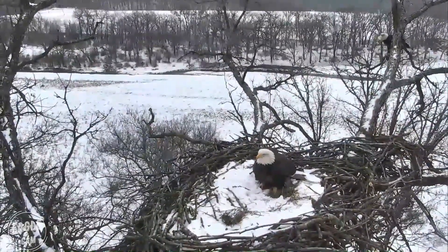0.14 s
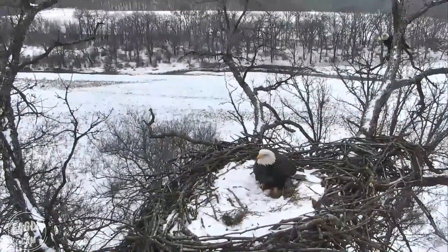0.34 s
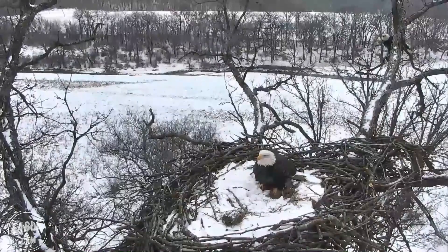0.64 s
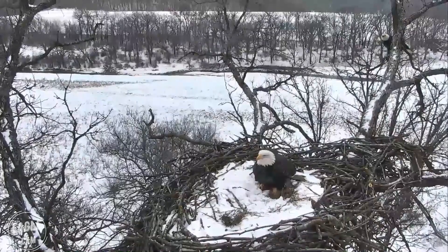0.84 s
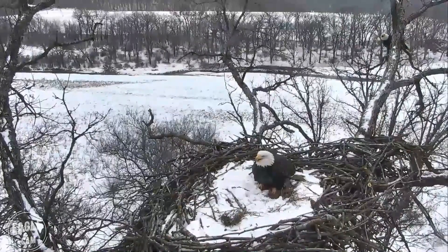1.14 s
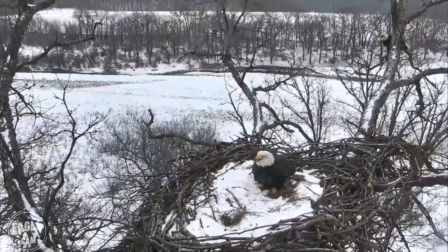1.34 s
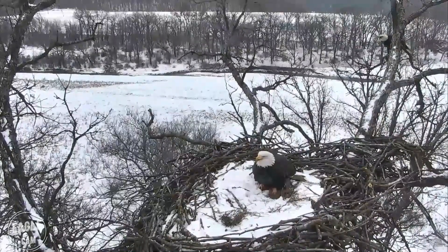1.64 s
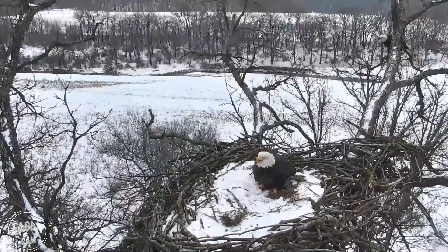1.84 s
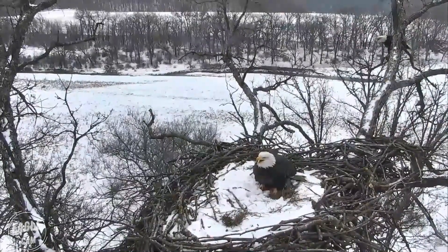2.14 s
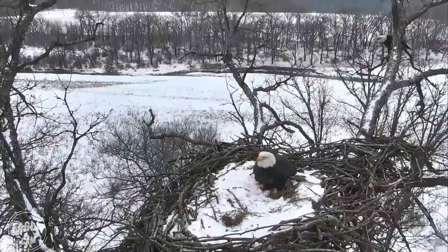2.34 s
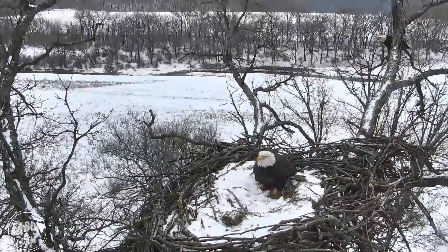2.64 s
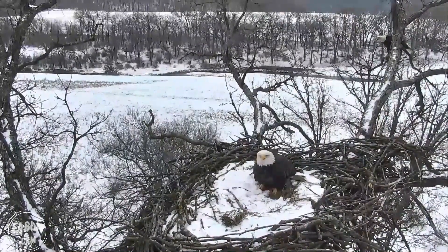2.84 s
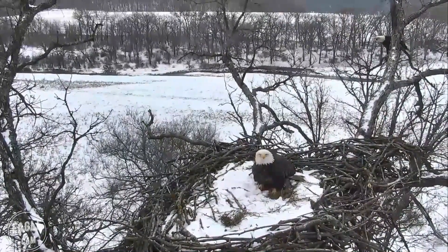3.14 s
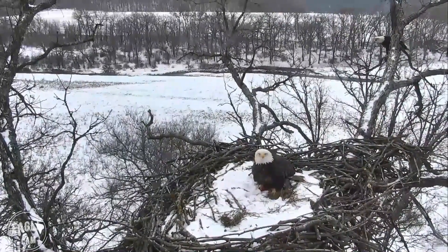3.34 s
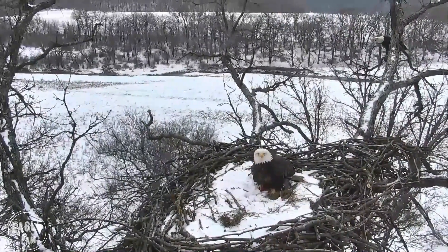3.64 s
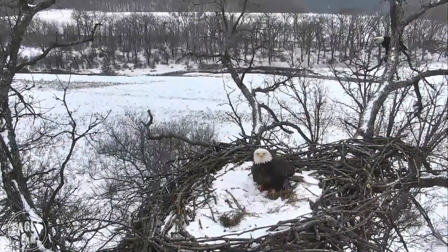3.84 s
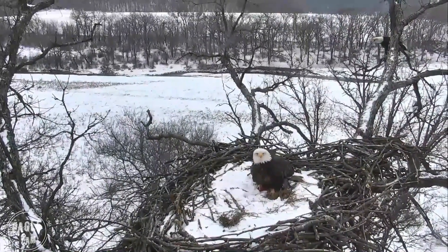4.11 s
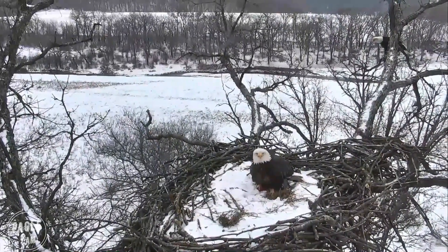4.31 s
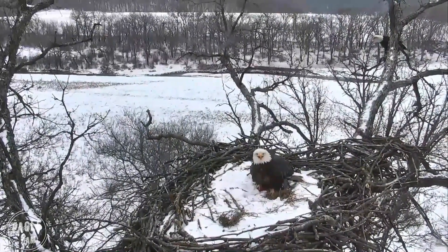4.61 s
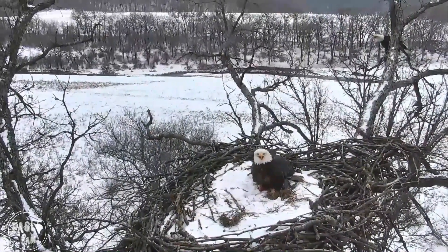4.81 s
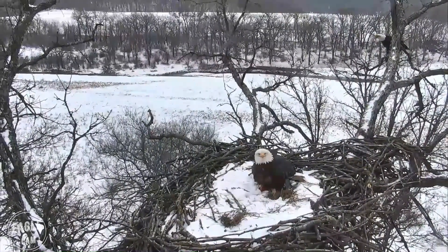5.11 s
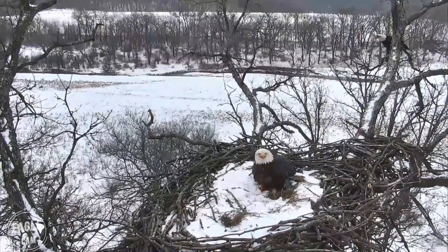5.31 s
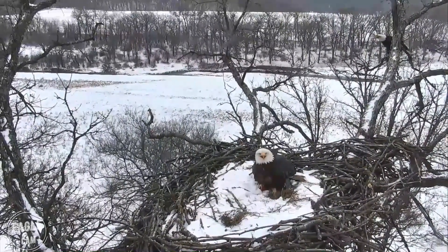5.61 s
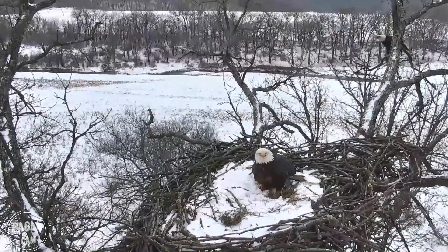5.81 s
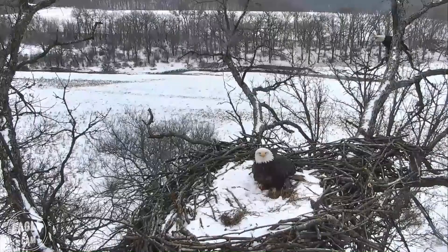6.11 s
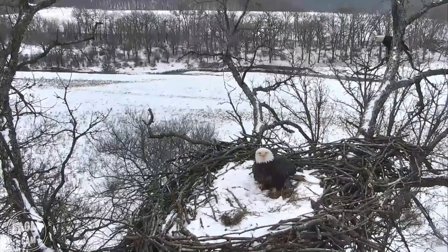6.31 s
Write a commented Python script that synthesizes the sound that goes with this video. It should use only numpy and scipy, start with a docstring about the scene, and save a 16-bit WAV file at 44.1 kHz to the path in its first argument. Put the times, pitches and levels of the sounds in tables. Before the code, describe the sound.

Two eagles call over a snowy open field. One pipes three runs of very short, near-pure whistles, each starting high and mostly falling, with little squeaks and cracks. The other gives four steady, nasal, raspy screams, lower and longer, dropping at the end. Close nest echoes and a faint scatter from trees surround them. Uneven low wind thumps on the microphone, with a soft airy rush and faint hiss behind.

```python
"""A treetop nest above a snowy field, where two bald eagles call in the wind.
One gives four long, hoarse screams: partials of a gliding pitch, roughened by a second vibration.
The other answers with three runs of piping chirps, near-pure whistles that mostly step down in pitch.
Nest and branches throw the calls back as filtered echoes and a thin scatter.
Wind, made of shaped noise, rumbles on the microphone and rushes through the trees."""
import sys
import numpy as np
from scipy import signal
from scipy.fft import rfft, irfft
from scipy.io import wavfile

SR = 44100
rng = np.random.default_rng(int(sys.argv[2]) if len(sys.argv) > 2 else 0)


def to_wav(sig):
    """Store sig (one row per channel, or 1-D mono) as 16-bit WAV at the path in sys.argv[1].

    Samples outside -1..1 are clipped; the rate is SR.
    """
    pcm = np.clip(np.atleast_2d(sig), -1, 1) * 32767
    pcm = np.round(pcm).astype(np.int16)
    wavfile.write(sys.argv[1], SR, pcm.T)  # frames by channels


N = 284886


def from_db(db):
    """Decibels to amplitude gain."""
    return 10 ** (np.asarray(db) / 20)


def rms_one(x):
    """Scale to unit power."""
    return x / np.sqrt(np.mean(x ** 2) + 1e-20)


def at_hz(points, hz):
    """Read a spectrum in dB on a log-frequency axis."""
    points = np.array(points)
    return np.interp(np.log(hz), np.log(points[:, 0]), points[:, 1])


def at_times(points, t):
    """Read a level curve at times t."""
    times, levels = np.transpose(points)
    return np.interp(t, times, levels)


def butter(x, hz, kind, order=2):
    """Causal Butterworth filter."""
    hz = np.clip(hz, 10, .45 * SR)
    return signal.sosfilt(signal.butter(order, hz, kind, fs=SR, output="sos"), x + 1e-18)


def wander(rate_hz, size):
    """Smooth random drift of about unit spread: noise low-passed at rate_hz, past the filter's start-up."""
    noise = rng.standard_normal(N // 4 + size)
    return rms_one(butter(noise, rate_hz, "low"))[-size:]


def gate(t, start, end, rise, fall):
    """Smooth fades centred on start and end."""
    opening = np.clip((t - start) / rise + .5, 0, 1)
    closing = np.clip((end - t) / fall + .5, 0, 1)
    return np.sin(np.pi / 2 * opening * closing) ** 2


def span(first_s, last_s):
    """Sample times of one call."""
    return np.arange(round(first_s * SR), round(last_s * SR)) / SR


def add(out, t, sound):
    """Mix a sound in at its times."""
    first = round(t[0] * SR)
    out[first:first + len(t)] += sound[:N - first]


def wind(rumble_db=0.0, buffet_db=0.72, rush_db=4.0, hiss_db=-60.5, lumps_db=0.7):
    """Low-band noise rumbles and buffets at the microphone; air rushes through bare trees over a hiss."""
    # relative spectrum of wind and hiss: f/Hz, density/dB per Hz
    air_spectrum = [(11, -23), (18, -9.5), (42, 0.5), (70, -4), (98, -3.5), (154, -16), (243, -22.5),
                    (452, -30), (691, -34), (998, -40.5), (1530, -46), (2330, -53.5), (3990, -60),
                    (5150, -65), (15500, -76.5)]
    # slow rumble at the microphone, before its trim: t/s, level/dB
    rumble_curve = [(0.0, -25), (0.03, -37), (0.07, -29), (0.74, -42), (1.17, -25.5), (1.29, -31.5),
                    (1.87, -34.5), (1.91, -24), (1.96, -36), (3.17, -46.5), (4.06, -41), (4.17, -29.5),
                    (4.25, -41), (5.13, -42.5), (6.03, -40.5), (6.12, -52), (6.41, -46), (6.46, -57)]
    # smaller eddies buffeting it, before their trim: t/s, level/dB
    buffet_curve = [(0.0, -38), (0.83, -42), (1.02, -34), (2.73, -45), (2.95, -40), (3.33, -42),
                    (3.38, -35.5), (3.44, -44.5), (3.63, -36.5), (3.69, -45.5), (4.19, -38.5), (4.3, -44),
                    (6.01, -44.5), (6.04, -38), (6.08, -51), (6.46, -48)]
    # wind in the trees, before its trim: t/s, level/dB
    rush_curve = [(0.0, -50), (0.25, -52.5), (0.9, -52), (1.01, -50), (3.17, -54.5), (4.08, -53.5),
                  (6.46, -56)]
    t = np.arange(N) / SR
    low_db, mid_db, high_db = at_times(rumble_curve, t), at_times(buffet_curve, t), at_times(rush_curve, t)
    hz = np.maximum(np.arange(N // 2 + 1) * SR / N, 1)
    air = irfft(rfft(rng.standard_normal(N)) * from_db(at_hz(air_spectrum, hz)), N)
    # reversing or rotating the same air keeps the bands from moving together
    low = rms_one(butter(air, 62.4, "low", order=4))
    mid = rms_one(butter(air[::-1], [70, 210], "band", order=3))
    high = rms_one(butter(np.roll(air, N // 3), [220, 1500], "band"))
    top = rms_one(butter(np.roll(air, N // 2), 1256, "high"))
    rumble = from_db(low_db + rumble_db) * low
    buffet = from_db(mid_db + buffet_db) * mid
    rush = from_db(high_db + rush_db) * high
    # the hiss follows the rush at half its swing in dB
    hiss = from_db(hiss_db + .5 * (high_db - np.mean(high_db))) * top
    return (rumble + buffet) * from_db(lumps_db * wander(29, N)) + rush + hiss


def scream(start, end, note_hz, climb_hz, scoop_hz, catch_hz, drop_hz, loud_db, swell_db, fundamental_db,
           rasp_delay, rasp_db, growth_db, ratio, unsteady, upper_db, first_tilt_db, last_tilt_db,
           beat_depth=0.12, roughness=0.011, jitter=.0012, waver_hz=4, shimmer_db=.5,
           mirror_db=-4, hoarse_db=-17, count=10):
    """A reedy tone catches, climbs and drops; a second vibration just under half its pitch makes it rasp."""
    # upper partials before tilt: f/Hz, level/dB against the second partial
    throat = [(2400, 1), (3650, -9.5), (4900, -17.5), (6100, -23.5), (7300, -38.5), (8600, -53),
              (9900, -50.5), (12000, -62.5), (14500, -76)]
    # side tones of the second vibration between the partials, before tilt: f/Hz, level/dB
    side_spectrum = [(600, -18.5), (1800, -2), (3050, -6.5), (4300, -14), (5500, -9.5), (6800, -20),
                     (8000, -34.5), (10000, -40), (14000, -54.5)]
    scoop_s, drop_s = .016, .042          # slide up onto the note; fall as the air runs out
    catch_at_s, catch_hz_per_s = .055, 1800   # deeper catches take longer
    climb_share = .85                     # share of the scream over which the pitch climbs
    push_db, push_s = .5, .04             # the first push of air is the strongest
    slack_db_per_hz, fundamental_db_per_hz = .1435, .06   # level lost as pitch sags
    rasp_rise_s, rasp_at_drop_db = .026, 9.5   # quick onset, flare at the end

    t = span(start - .02, end + .02)
    size = len(t)
    age = np.maximum(t - start, 0)
    progress = np.minimum(age / (end - start), 1)

    drop = np.clip(1 - (end - t) / drop_s, 0, 1.2) ** 2
    catch = np.exp(-((age - catch_at_s) * catch_hz_per_s / catch_hz) ** 2)
    slack_hz = scoop_hz * np.exp(-age / scoop_s) + catch_hz * catch + drop_hz * drop
    climb = climb_hz * np.sin(np.pi / 2 * np.minimum(progress / climb_share, 1))
    pitch = note_hz + climb - slack_hz + waver_hz * wander(15.6, size)

    effort_db = loud_db + swell_db * (progress - .5)
    level_db = effort_db + push_db * np.exp(-age / push_s) - slack_db_per_hz * slack_hz
    base_db = effort_db + fundamental_db - fundamental_db_per_hz * slack_hz
    tilt_db = first_tilt_db + (last_tilt_db - first_tilt_db) * progress - 6 * drop

    # the less steady the second vibration, the more the rasp surges and the grittier it is
    surge_db, grit_db = 1.34 + 22 * unsteady, -17.5 + 85 * unsteady
    rasp_in = np.clip((age - rasp_delay) / rasp_rise_s + .5, 0, 1)
    side_db = effort_db + rasp_db - 20 * (1 - rasp_in)
    side_db = side_db + growth_db * (progress - .5) + rasp_at_drop_db * drop
    side_db = np.minimum(side_db, level_db - 4.5)
    side_db = side_db + surge_db * (0.91 * wander(14, size) + .7 * wander(56, size))
    strain = np.minimum(from_db(side_db - level_db), 1)

    tremor = jitter * wander(82, size) + roughness * strain ** 0.87 * wander(630, size)
    phase = 2 * np.pi * np.cumsum(pitch * (1 + tremor)) / SR
    second = 2 * np.pi * np.cumsum(pitch * ratio * (1 + unsteady * wander(130, size))) / SR
    # the two vibrations do not lock, so the tone is pulled at their beat rate
    beat = np.sin(phase - 2 * second)
    phase = phase + beat_depth * strain * beat

    voice = from_db(base_db) * np.sin(phase)
    for k in range(1, count + 1):
        colour_db = (tilt_db * np.log2(k / 2) + upper_db) * (k > 2)
        partial = k * phase + rng.uniform(0, 2 * np.pi)
        if k > 1:
            voice += from_db(level_db + at_hz(throat, k * pitch) + colour_db) * np.sin(partial)
        upper_side = np.sin(partial - phase + second)
        mirror = from_db(mirror_db * (k > 1)) * np.sin(partial - second)
        hoarse = from_db(hoarse_db) * wander(380, size) * np.sin(partial - phase / 2)
        side_gain = from_db(side_db + at_hz(side_spectrum, (k - .5) * pitch) + colour_db)
        voice += side_gain * (upper_side + mirror + hoarse)

    # turbulent air comes in gritty spurts with the beat
    turbulence = butter(rng.standard_normal(size), [2300, 6000], "band", order=4)
    grit = rms_one(turbulence * (1 + 0.37 * beat))
    voice = np.sqrt(2) * voice + from_db(side_db + grit_db) * grit
    shimmer = from_db(shimmer_db * wander(64, size))
    return t, voice * shimmer * gate(t, start, end, rise=0.011, fall=0.015)


def treetop(x, near_db, woods_db, t60=0.81, woods_cut_hz=5800):
    """A few close, dulled reflections, then a thin decaying scatter from the surrounding trees."""
    # reflections from nest and trunk, before near_db: delay/s, level/dB, treble cut f/Hz
    reflections = [(.0068, -11, 7170), (0.0107, -13, 9270), (0.0226, -17.5, 7000)]
    out, t = x.copy(), np.arange(N) / SR
    for delay, db, cut_hz in reflections:
        delayed = np.interp(t - delay, t, x, left=0)
        out += from_db(db + near_db) * butter(delayed, cut_hz, "low", order=1)
    age = t[:SR]
    scatter = rng.standard_normal(SR) * from_db(-60 * age / t60) * (age > .014)
    scatter = butter(scatter / np.linalg.norm(scatter), woods_cut_hz, "low")
    return out + from_db(woods_db) * signal.fftconvolve(x, scatter)[:N]


def whistle(pitch, second_db, jitter, third_db=-27, fourth_db=-45):
    """A near-pure tone with three overtones that rise and fall together."""
    phase = 2 * np.pi * np.cumsum(pitch * (1 + jitter * wander(550, len(pitch)))) / SR
    partials_db = [0, second_db, second_db / 2 + third_db, second_db / 2 + fourth_db]
    return np.sqrt(2) * sum(from_db(db) * np.sin((k + 1) * phase) for k, db in enumerate(partials_db))


def squeak(start, length, from_hz, to_hz, level_db, second_db):
    """A short, shaky whistle sliding in a straight line between two pitches."""
    t = span(start - .01, start + .03)
    pitch = np.interp(t, [start, start + length], [from_hz, to_hz])
    tone = whistle(pitch, second_db, jitter=.021, third_db=-29)
    return t, from_db(level_db) * tone * gate(t, start, start + length, rise=0.0024, fall=0.0057)


def chirp(start, hz, length, level_db, second_db, scoop, break_s=0.0018, flutter_s=0.01385, arch=0.046,
          dip_db=9, sag=0.85, low_hz=2080, low_db=-7, crack_db=-21):
    """The voice starts in another register and breaks with a crack into a note that flutters in pulses."""
    # third partial, weaker on the highest chirps, before half the second's level: pitch f/Hz, level/dB
    third_partial = [(3200, -28), (3900, -30.5)]
    t = span(start - .02, start + .06)
    age = t - start
    slide = scoop / (1 + np.exp(np.clip(2 * (age - .0008) / break_s, -20, 20)))   # octaves
    # pitch, level and brightness drop in the slack between pulses; taut high notes flutter less
    looseness = np.interp(hz, [3200, 3900], [1, .45])
    flutter_period = flutter_s * np.exp(rng.normal(0, 0.19))
    slack = looseness * np.cos(np.pi * age / flutter_period) ** 4
    bend = arch * (slack - .2) + sag * (age - length / 2)
    pulses = from_db(-dip_db * slack * np.clip(age / .006, 0, 1))
    note = whistle(hz * 2 ** (-slide - bend), second_db - 6 * slack, jitter=0.01,
                   third_db=at_hz(third_partial, hz))
    note = note * pulses * gate(age, 0.0014, length, rise=0.0041, fall=0.0073)
    # deep scoops begin with a blip in the low register
    blip = max(scoop, 0) * whistle(low_hz * 2 ** (18 * age), -19, jitter=.022)
    blip = blip * gate(age, -0.0023, 0.0024, rise=0.0012, fall=0.0058)
    crack = rms_one(butter(rng.standard_normal(len(t)), [0.5 * hz, 1.38 * hz], "band", order=3))
    crack = crack * gate(age, -0.0005, 0.0062, rise=0.0027, fall=0.006)
    mix = note + from_db(low_db) * blip + from_db(crack_db) * np.sqrt(looseness) * crack
    return t, from_db(level_db) * mix


def piping():
    """Three runs of chirps; squeaks open the first two and hooks lead into many of the high notes."""
    # chirps: t/s, pitch f/Hz, length/s, level/dB, second partial/dB
    chirps = [ (1.395, 3980, 0.031, -32, -8.5), (1.509, 3923, 0.029, -24.5, -13),
              (1.629, 3848, 0.023, -22, -10), (1.754, 3124, .022, -29.5, -8.5),
              (1.88, 3000, 0.021, -32, -9.5), (2.015, 2930, 0.0078, -32.5, -7.5),
              (2.134, 2680, 0.022, -34, -15.5), (3.197, 3923, 0.041, -30, -21.5),
              (3.314, 3920, 0.034, -28.5, -26), (3.435, 3883, 0.027, -26.5, -22.5),
              (3.565, 3186, 0.031, -28, -15.5), (3.703, 3060, .026, -31.5, -12),
              (3.852, 2973, 0.036, -33.5, -10), (4.008, 2846, 0.026, -33.5, -10),
              (4.165, 2120, 0.0051, -42, -21), (4.31, 1887, 0.0067, -32, -13.5),
              (5.574, 3080, 0.025, -29.5, -12.5), (5.678, 3890, 0.027, -27, -18),
              (5.793, 3857, .026, -25.5, -19), (5.913, 3810, 0.035, -30, -21),
              (6.04, 3147, 0.027, -29, -12.5), (6.161, 2975, 0.023, -32.5, -8.5),
              (6.281, 2877, .023, -36, -11.5), (6.411, 2736, 0.019, -40, -17.5)]
    # start below (or above, if negative) the note, deepest mid-range: pitch f/Hz, depth/octaves
    scoops = [(1900, -0.25), (2150, 0.64), (2930, .65), (3170, .32), (3830, -0.22), (3910, 0.096)]
    # hooks, a falling squeak then an upward flick: t/s, pitch f/Hz, level/dB, flick delay/s, flick level/dB
    hooks = [(1.376, 4850, -40, 0.013, -32), (1.498, 4860, -37, 0.0094, -31),
             (3.302, 4980, -38, 0.013, -33.5), (3.426, 4620, -39, .009, -39),
             (5.664, 4600, -33, .013, -29.5), (5.782, 4850, -35.5, 0.0069, -42),
             (5.905, 4400, -44, 0.0081, -48)]
    # soft opening squeaks: t/s, length/s, from f/Hz, to f/Hz, level/dB, second partial/dB
    squeaks = [(1.296, 0.015, 3950, 4270, -45.5, -1), (3.173, .005, 3370, 3210, -54.5, -8),
               (3.186, 0.0097, 3350, 4400, -51.5, -10)]
    hook_s, hook_fall_hz, hook_second_db = .0074, 400, -31.5
    flick_s, flick_from_hz, flick_to_hz = .004, 4600, 4780
    out = np.zeros(N)
    for start, hz, length, level_db, second_db in chirps:
        add(out, *chirp(start, hz, length, level_db, second_db, at_hz(scoops, hz)))
    for start, hz, level_db, flick_delay, flick_db in hooks:
        add(out, *squeak(start, hook_s, hz, hz - hook_fall_hz, level_db, hook_second_db))
        flick_at = start + flick_delay
        add(out, *squeak(flick_at, flick_s, flick_from_hz, flick_to_hz, flick_db, hook_second_db))
    for row in squeaks:
        add(out, *squeak(*row))
    return out


def scene():
    """Both birds in the treetop, with the wind."""
    # screams: start t/s, end t/s, pitch f/Hz, climb/Hz, scoop/Hz, catch/Hz, drop/Hz, level/dB, swell/dB,
    # fundamental/dB against the second partial, rasp delay/s, rasp/dB against the tone, rasp growth/dB,
    # second vibration/share of pitch, its unsteadiness/share, upper partials/dB,
    # first brightness/dB per octave, last brightness/dB per octave
    scream_rows = [ (1.183, 1.558, 1144, 5.9, 33, 26, 60, -37, -1, -5.5, 0.097, -5, 4.5, .462, .012, -4.5, 1.5, -5.5),
                   (1.915, 2.34, 1179, 69, -1, 51.4, 116, -31, 1, -6.5, 0.014, -6.5, 8, .452, 0.02, 3.5, -14.5, -5.5),
                   (4.42, 5.062, 1197, 44, 96.5, 31.7, 176, -30, 1.5, -4, 0.067, -18, -5, .488, .05, -2, 2.5, 2.5),
                   (5.432, 5.831, 1201, 36, -1.5, 32.4, 94.5, -29, 0, -6, 0.027, -18, 9, .482, 0.0604, -4, 2, 3.5)]
    screams = np.zeros(N)
    for row in scream_rows:
        add(screams, *scream(*row))
    screamer = treetop(screams, near_db=-23.5, woods_db=-23.5, woods_cut_hz=2600)
    piper = treetop(piping(), near_db=0.5, woods_db=-18)
    return (screamer + piper + wind())[None]


def record(dry):
    """A steep elliptic low-pass cuts the top of the treble."""
    cutoff_hz = 15800
    return signal.sosfilt(signal.ellip(10, .1, 90, cutoff_hz, fs=SR, output="sos"), dry)


dry = scene()
out = record(dry)
to_wav(out)
```